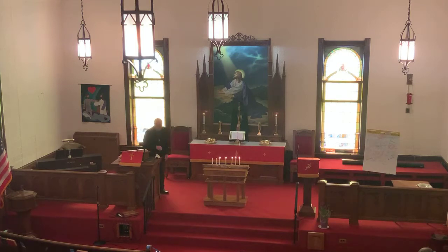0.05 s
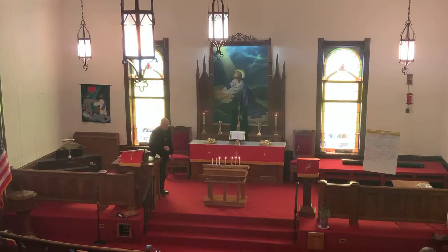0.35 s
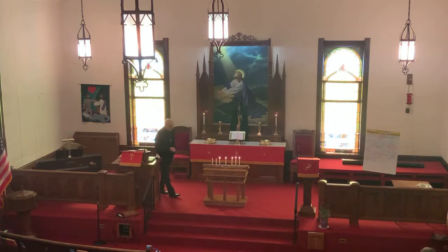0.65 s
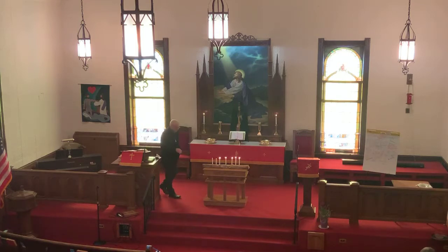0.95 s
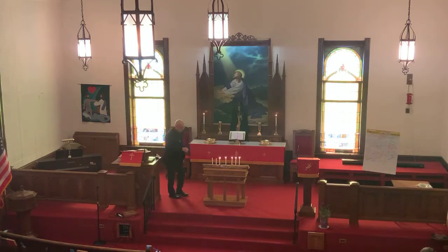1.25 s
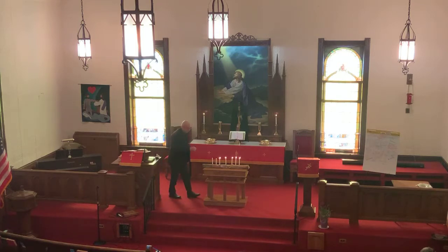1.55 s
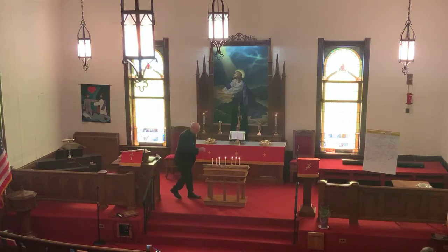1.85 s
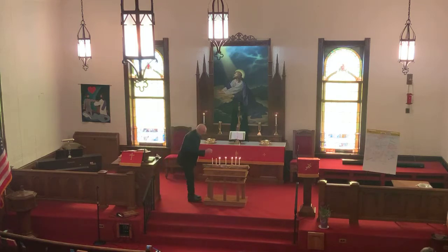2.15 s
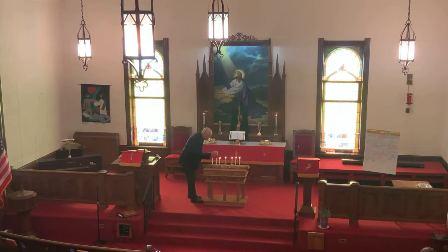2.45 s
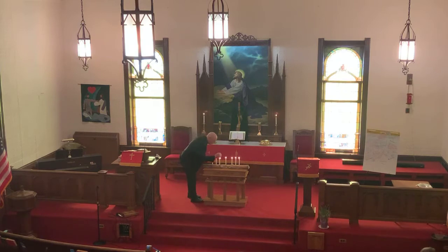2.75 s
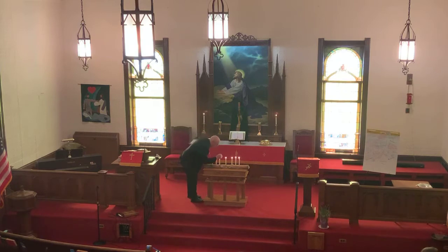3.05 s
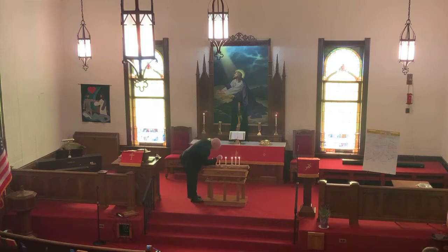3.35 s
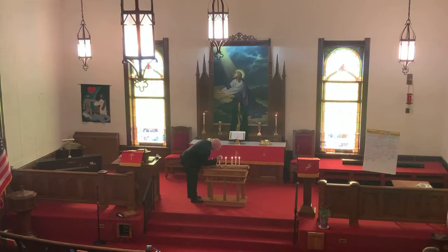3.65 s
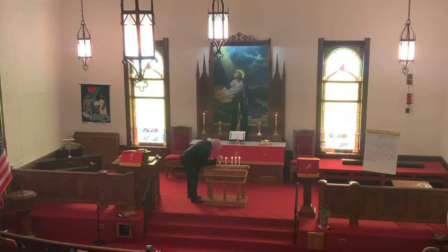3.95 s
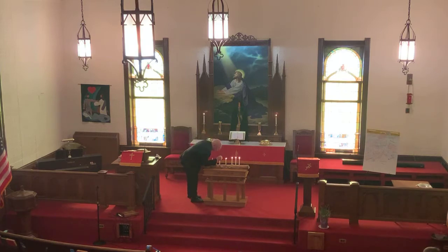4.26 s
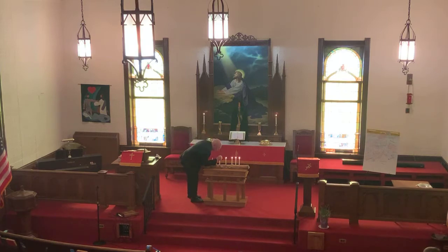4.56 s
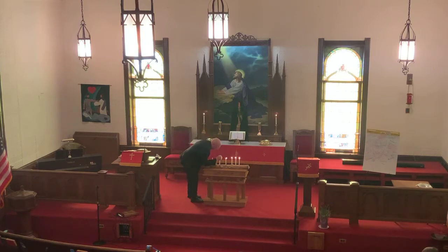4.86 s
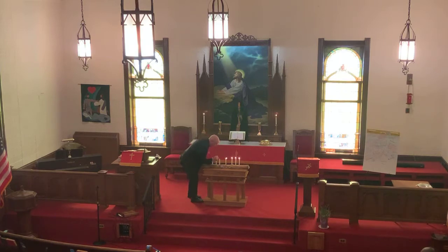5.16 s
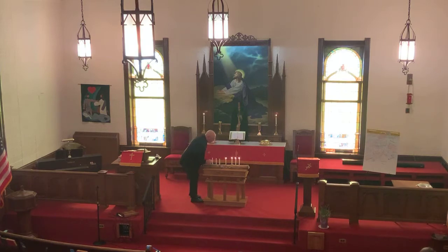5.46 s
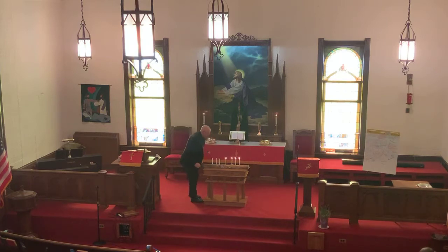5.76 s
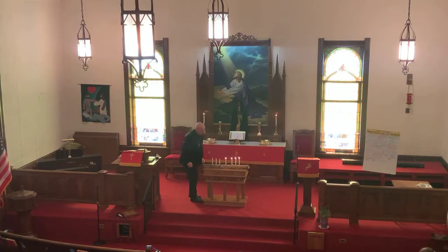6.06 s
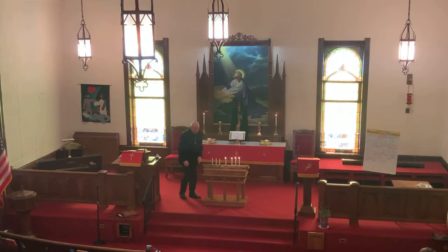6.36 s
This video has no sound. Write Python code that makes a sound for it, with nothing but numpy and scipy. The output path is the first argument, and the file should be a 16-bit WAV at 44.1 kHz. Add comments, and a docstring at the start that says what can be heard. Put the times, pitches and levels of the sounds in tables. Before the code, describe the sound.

Heard from the back of a large church, someone steps softly with rustling clothes, then strikes a wooden stand three times, about a second and a half apart. Each loud blow rings the boards, thumps the hollow platform beneath and echoes away, the last one brightest. Under it all run a quiet electric hum and a muffled engine outside, which rises a little at the end after one more light footstep.

```python
"""An electric hum and dull air noise fill a church; an engine outside fades in, and revs up at the end.
Faint shoe taps and rustling clothes come and go. Three hard knocks on a wooden altar stand are heard
from far back: each blow cracks, rings the boards and thumps the hollow platform below,
then echoes off the far wall and dies away in the hall."""
import sys
import numpy as np
from scipy import signal
from scipy.fft import rfft, irfft, next_fast_len
from scipy.io import wavfile
from scipy.ndimage import uniform_filter1d, map_coordinates

SR = 44100
rng = np.random.default_rng(int(sys.argv[2]) if len(sys.argv) > 2 else 0)


def transcribe(u):
    """Save the signal u as a 16-bit wav file named by the first command-line argument.

    u: samples, shape (n,) or (channels, n), limited to [-1, 1]; the rate is SR.
    q: integer samples, one column per channel.
    """
    v = np.clip(np.atleast_2d(u).T, -1, 1)
    q = np.round(v * 32767).astype(np.int16)
    wavfile.write(sys.argv[1], SR, q)


N = 290707


def amp(db):
    """Turn decibels into a gain to multiply by."""
    return 10 ** (np.asarray(db) / 20)


def unit(x):
    """Scale a sound to an average (rms) level of 1."""
    return x / np.sqrt(np.mean(x ** 2) + 1e-20)


def along(points, hz, column=1):
    """Read a table between its rows, on a log frequency scale."""
    table = np.transpose(points)
    return np.interp(np.log(hz + 1), np.log(table[0] + 1), table[column])


def wobble(rate):
    """A smooth random curve through `rate` new values a second."""
    return map_coordinates(rng.standard_normal(int(N * rate / SR) + 4), [np.arange(N) * rate / SR])


def filtered(x, response):
    """Turn each frequency up or down by the gain response(hz)."""
    size = next_fast_len(len(x) + SR // 4)
    return irfft(rfft(x, size) * response(np.fft.rfftfreq(size, 1 / SR)), size)[:len(x)]


def noise(spectrum, size):
    """Noise of average level 1; the table sets only its tone colour."""
    return unit(filtered(rng.standard_normal(size), lambda hz: amp(along(spectrum, hz))))


def swell(t, rise, t60):
    """A loudness curve that builds up softly, then falls 60 dB every t60 seconds."""
    t = np.maximum(t, 0)
    return (1 - np.exp(-(t / rise) ** 2)) * np.exp(-np.log(1000) * t / t60)


def add(track, s, sound):
    """Mix a sound into the track at s seconds."""
    start = round(s * SR)
    track[start:start + len(sound)] += sound[:N - start]


def room_tone():
    """A slightly wavering electric hum over dull air noise."""
    # tones of the hum: f/Hz, level/dB
    hum_tones = [(119, -56.5), (241, -69.5), (356, -68.5), (479, -73.5)]
    # still air of the church: f/Hz, level/dB
    air = [(20, -36.5), (40, -11), (62, -3.5), (120, 0.5), (175, -6.5), (340, -10.5), (550, -18),
           (900, -22.5), (1450, -24), (2300, -31), (3500, -40.5), (6400, -50.5), (16000, -50)]
    t = np.arange(N) / SR
    waver = lambda hz: unit(amp(2.5 * wobble(7)) * np.sin(2 * np.pi * hz * t + 1.1 * wobble(6)))
    hum = sum(amp(db) * waver(hz) for hz, db in hum_tones)
    return hum + amp(-53.5 + 0.67 * wobble(1.9)) * noise(air, N)


def engine():
    """Only low exhaust tones pass through the walls; overtones and rumble grow with engine speed."""
    # how often the engine fires: t/s, f/Hz
    speeds = [(0, 75.1), (1.3, 74), (2.8, 69.5), (3.3, 73.53), (4.5, 68), (5.05, 74.84), (5.7, 63.44),
              (6.1, 66.34), (6.59, 94)]
    # overtones: multiple of the firing rate, relative level/dB
    orders = [(1.5, -3.5), (2, -9)]
    # low rumble: f/Hz, level/dB
    rumble_colour = [(25, -28.5), (50, -2), (130, -5.5), (220, -19), (500, -47), (2000, -83)]
    cruise_hz, coast_db, pull_db = 75, -53, 3
    t = np.arange(N) / SR
    firing_hz = np.interp(t, *np.transpose(speeds))
    acceleration = uniform_filter1d(np.gradient(firing_hz) * SR, size=SR // 5)
    pull = np.clip(acceleration / 8, 0, 1)  # pulls hardest when gaining 8 Hz a second
    fade_in = 1 - np.exp(-t / 0.36)
    phase = 2 * np.pi * np.cumsum(firing_hz) / SR
    overtones = sum(amp(db + 2.5 * wobble(4.5)) * np.sin(k * phase + .7 * wobble(6.7))
                    for k, db in orders)
    overtones *= amp(-8 + 0.48 * (firing_hz - cruise_hz))
    firing = amp(1.3 * wobble(11)) * np.sin(phase + 0.18 * wobble(16))
    rumble = amp(-13) * (firing_hz / cruise_hz) ** 4 * noise(rumble_colour, N)
    return fade_in * amp(coast_db + pull_db * pull) * (np.sqrt(2) * (firing + overtones) + rumble)


def walker():
    """Shoes tap softly and the room answers; clothes and soles brush the carpet."""
    # taps on the platform: t/s, level/dB
    taps = [(.618, -48.5), (5.923, -52.5)]
    # sound of a shoe: f/Hz, level/dB
    shoe = [(100, -30), (500, 9), (1500, -1), (2600, -8), (5000, -29), (12000, -54)]
    # brushing strokes: middle t/s, length/s, rustle level/dB, hiss level/dB
    brushes = [(0.867, 0.27, -67.5, -71.5), (1.142, 0.22, -74, -86), (1.62, 0.45, -68, -84),
               (2.14, 0.046, -71, -73)]
    # rustle of cloth: f/Hz, level/dB
    cloth = [(200, -9.5), (900, 8.5), (2200, 5.5), (5000, -5), (9000, -19.5), (15000, -21)]
    # fine hiss of a stroke: f/Hz, level/dB
    hiss = [(2000, -25), (6000, -9), (10000, -10), (13000, -2), (15500, -2)]
    cloth_gain = sum(amp(db) * stroke(s, length) for s, length, db, _ in brushes)
    hiss_gain = sum(amp(db) * stroke(s, length) for s, length, _, db in brushes)
    flutter = amp(1.1 * wobble(16))
    track = flutter * (cloth_gain * noise(cloth, N) + hiss_gain * noise(hiss, N))
    t = np.arange(SR) / SR
    tap_and_room = swell(t, rise=0.0016, t60=0.15) + amp(-4.5) * swell(t, rise=0.053, t60=0.5)
    for s, db in taps:
        add(track, s, amp(db) * noise(shoe, len(t)) * tap_and_room)
    return track


def stroke(s, length):
    """A smooth rise and fall around time s, above half strength for `length` seconds."""
    return .5 ** ((2 * (np.arange(N) / SR - s) / length) ** 2)


def knocks():
    """Each blow cracks, rings the boards and thumps the platform; then the church answers."""
    # blows: t/s, ring level/dB, ring length factor, thump level/dB, crack level/dB,
    # treble tilt/dB per tenfold frequency, hall level/dB, far wall level/dB (levels are relative)
    blows = [(2.2981, 2, 1.04, 0.5, 1, -3.5, -1, -2), (3.7223, 0.6, 1.32, 1.5, 2.5, -4.5, 0.83, -2),
             (5.1822, -0.5, 1.43, 3, 1, 3, 2.7, 1.5)]
    # tones of the stand's boards: f/Hz, level/dB, fade time/s
    wood = [(203, -21.5, 0.38), (271, -10.5, 0.097), (343.6, -10, .2), (397, -15.5, 0.11),
            (415.6, -13, 0.13), (455, -15, 0.18), (507, -4.5, .12), (553, -16.5, 0.14), (620.5, -16, 0.16),
            (829, -21, .12), (887, -19, 0.092), (954, -24.5, 0.093), (1181, -14, .08), (1338, -18.5, .09),
            (1567, -24, 0.1), (1666, -19.5, .07), (1845, -29, 0.17), (2170, -19.5, 0.1),
            (3200, -28.5, 0.11)]
    # tones of the hollow platform: f/Hz, level/dB, fade time/s
    platform = [(62.5, -20, .5), (84.7, -22, 0.57), (105.4, -10, .28), (117.1, -22.5, 0.73)]
    # tones that linger between the walls: f/Hz, level/dB, fade time/s
    standing_waves = [(191.4, -29.5, .6), (212, -28.5, 0.84), (228.4, -25, 0.8), (240.5, -21.5, 0.9),
                      (338.7, -23.5, 0.74), (358, -27, 0.87), (390.4, -22.5, 0.75), (490, -27.5, 0.59),
                      (515, -26, .62), (624, -28, 0.75), (660, -34, 0.86), (1210, -38, .75),
                      (1357, -39.5, 0.94), (1850, -44, 0.59), (2217, -44, 0.96), (2990, -46, 0.51)]
    track, t = np.zeros(N), np.arange(3 * SR // 2) / SR
    grain = timber()
    for s, ring_db, length, thump_db, crack_db, treble_db, hall_db, wall_db in blows:
        # a harder contact is shorter and so carries more treble
        colour = lambda hz: grain(hz) * amp(treble_db * np.log10(np.maximum(hz / 1000, 1)))
        boards = amp(ring_db - 2) * ring(wood, t, rise=0.0094, length=length)
        blow = boards + amp(crack_db - 13) * crack(t, colour)
        # the weight of the blow moves the platform and sets the hall ringing
        boom = amp(thump_db) * (ring(platform, t, rise=.014) + ring(standing_waves, t, rise=0.054))
        echo = amp(wall_db) * far_wall(blow)
        hall = amp(hall_db - 15.5) * reverberation(t, colour)
        add(track, s, blow + boom + echo + hall)
    return track


def timber():
    """The stand's countless finer tones: a jagged gain over frequency that every blow shares."""
    bumps = rng.standard_normal(SR // 40)
    jagged = lambda hz: map_coordinates(bumps, [hz / 26], mode="nearest")  # a new value every 26 Hz
    return lambda hz: amp(2.2 * np.minimum(hz / 1500, 1) * jagged(hz))


def crack(t, colour):
    """The snap of wood on wood, scattered by the furniture and walls close by."""
    # splintery crack: f/Hz, level/dB
    splinter = [(20, -23.5), (45, -1.5), (150, 3), (420, 4), (700, -1), (1000, 0.5), (1600, -3), (2300, -8),
                (3200, -13), (5200, -17.5), (6600, -15), (9000, -21), (16000, -27.5)]
    snap = filtered(noise(splinter, len(t)), colour)
    clumps = unit(amp(1.8 * wobble(300)[:len(t)]))  # reflections arrive in bunches
    burst = amp(1.5) * swell(t, rise=0.0051, t60=0.061)
    tail = amp(-4.5) * swell(t, rise=0.013, t60=0.33)
    return snap * clumps * (burst + tail)


def ring(tones, t, rise, length=1):
    """Fading tones that start together, at slightly new strengths and pitches for each blow."""
    total = np.zeros(len(t))
    for k, (hz, db, t60) in enumerate(tones):
        strength_db, detune = rng.normal(0, [1.3, .004])
        sign = (-1) ** k  # neighbouring tones push the air in opposite directions
        wave = sign * np.sin(2 * np.pi * hz * (1 + detune) * t)
        total += amp(db + strength_db) * wave * swell(t, rise, t60 * length)
    return total


def reverberation(t, colour):
    """The hall fills with reflections and empties again, the treble first."""
    # wash of sound after a blow: f/Hz, level/dB, time to fade by 60 dB/s
    hall = [(25, -5, 0.73), (45, -5.5, 0.62), (65.2, 15, 0.94), (116, 13, 0.78), (148, 0, 0.94),
            (365, 4.5, 0.87), (606, -1.5, 0.83), (1100, -4.5, 0.9), (1704, -8.5, 0.89), (2296, -9, 0.82),
            (3700, -17, 0.7), (6810, -21.5, 0.52), (11170, -29, .3), (16000, -33, .22)]
    wash = filtered(noise(hall, len(t)), colour)
    hz, age, bands = signal.stft(wash, SR, nperseg=512)  # split up so each band fades at its own pace
    fade = amp(-60 * age / along(hall, hz, column=2)[:, None])
    tail = signal.istft(bands * fade, SR, nperseg=512)[1][:len(t)]
    return tail * (1 - np.exp(-(t / 0.053) ** 2))


def far_wall(x):
    """The far wall's echo comes 62 ms late, smeared by benches and panelling."""
    # tone colour of the echo: f/Hz, level/dB
    wall = [(100, -15.5), (500, -12), (1300, -8.5), (2600, -7.5), (4500, -12), (8000, -16.5),
            (16000, -20.5)]
    t = np.arange(SR // 8) / SR
    burst = rng.standard_normal(len(t)) * swell(t - .062, rise=0.0014, t60=0.03)
    echo = filtered(burst / np.linalg.norm(burst), lambda hz: amp(along(wall, hz)))
    return signal.fftconvolve(x, echo)[:len(x)]


def scene():
    """All the sounds together in one channel."""
    return (knocks() + walker() + engine() + room_tone())[None]


def record(dry):
    """Round off the highest peaks and cut the very top of the treble."""
    top_hz = 15800
    rounded = dry[0] / (1 + np.abs(dry[0]) ** 8) ** (1 / 8)
    return filtered(rounded, lambda hz: np.clip((top_hz - hz) / 300 + .5, 0, 1))[None]


dry = scene()
out = record(dry)
transcribe(out)
```